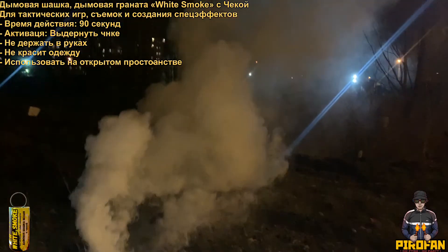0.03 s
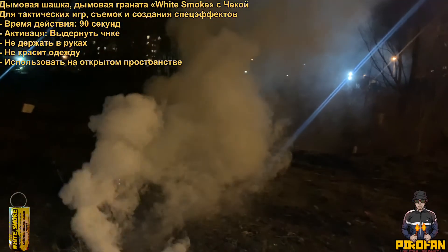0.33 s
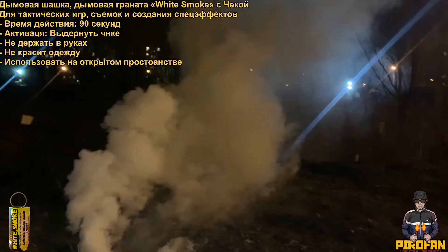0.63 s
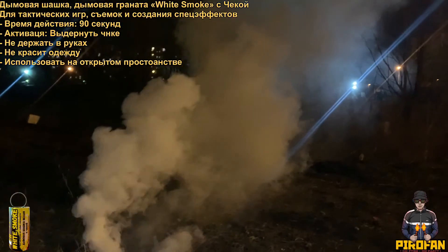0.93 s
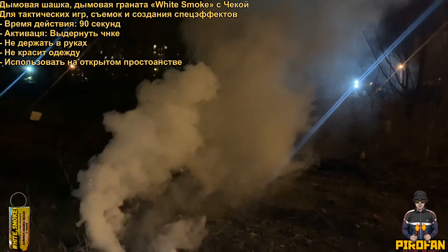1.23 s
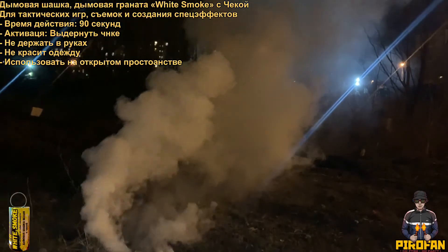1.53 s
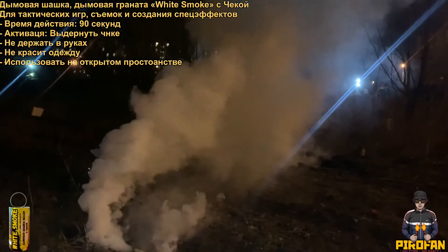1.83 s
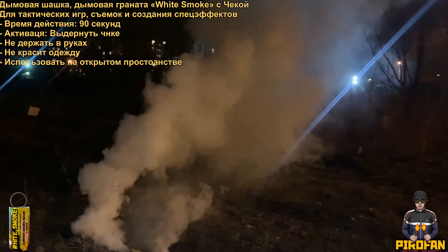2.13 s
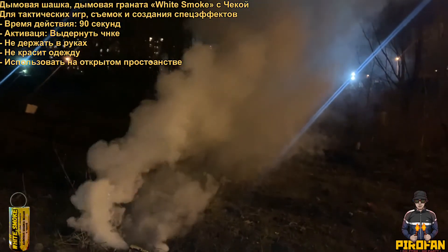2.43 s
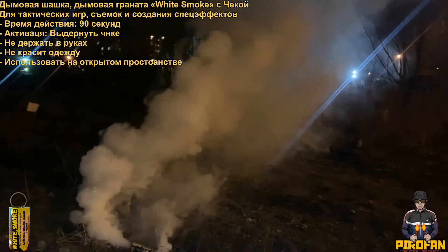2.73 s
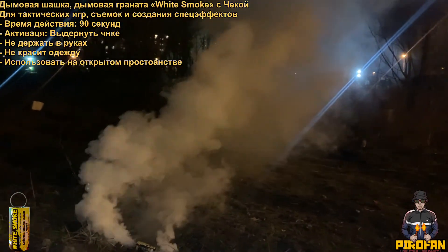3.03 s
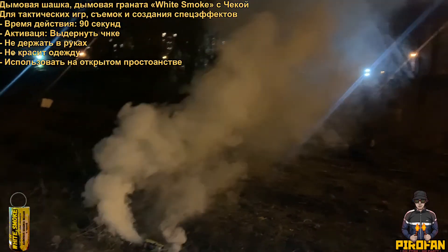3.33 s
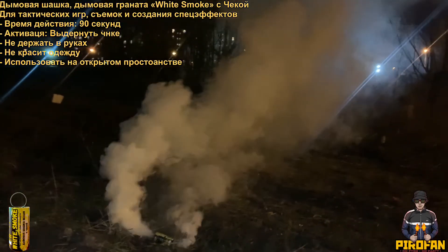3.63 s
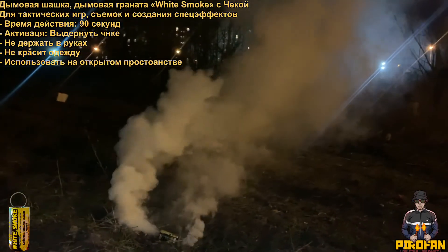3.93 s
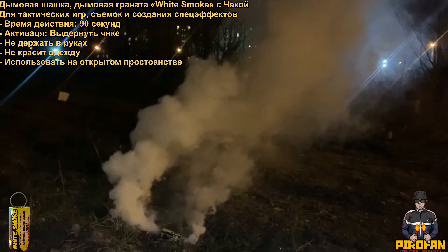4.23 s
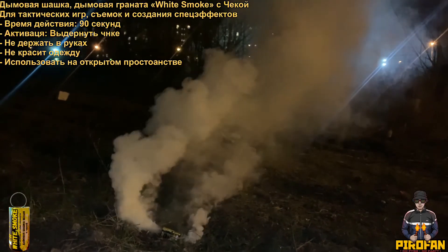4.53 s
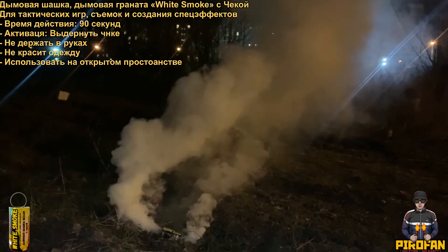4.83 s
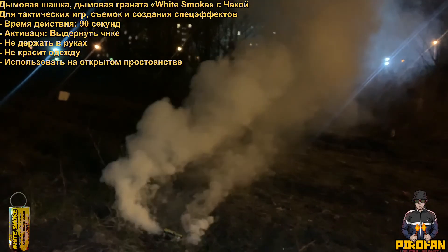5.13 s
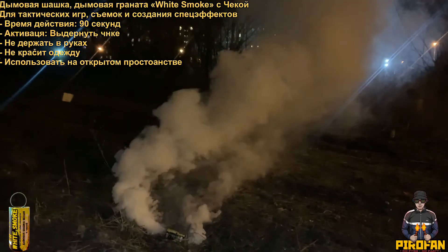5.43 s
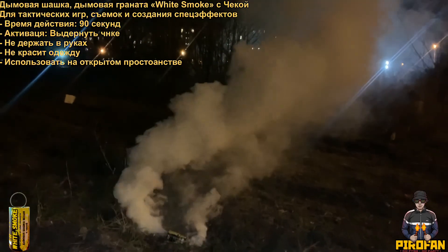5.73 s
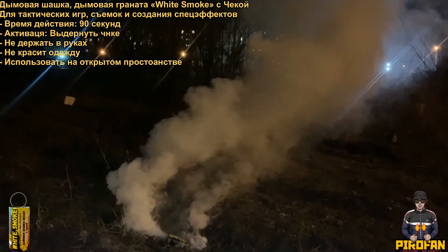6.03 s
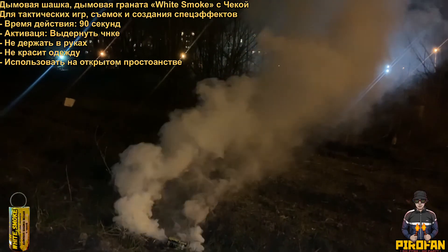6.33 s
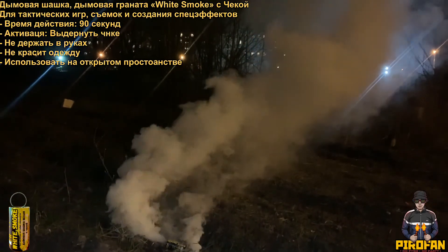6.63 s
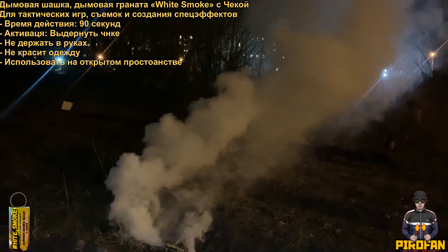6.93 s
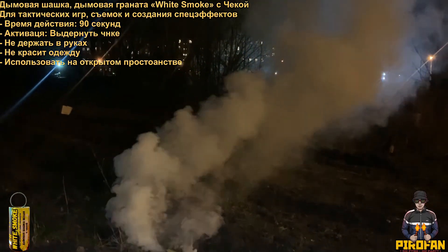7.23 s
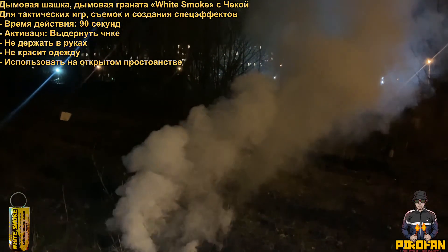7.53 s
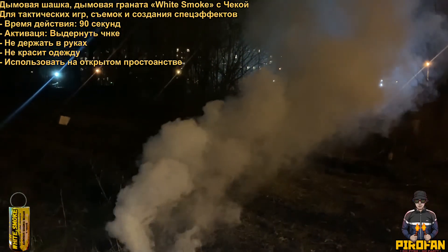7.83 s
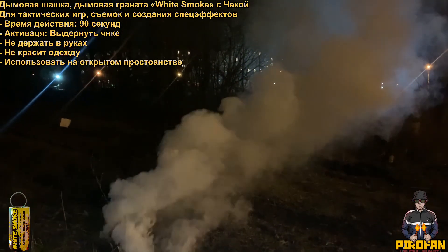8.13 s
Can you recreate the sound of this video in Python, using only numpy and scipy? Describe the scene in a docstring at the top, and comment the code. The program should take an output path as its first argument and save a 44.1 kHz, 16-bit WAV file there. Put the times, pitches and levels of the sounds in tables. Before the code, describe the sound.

A steady low rumble of far engines and tyres fills an open outdoor space, growing a little brighter as a car approaches. Close by, a smoke grenade hisses softly with a high, ringing edge. It breaks into spurts and small spits, then weakens, leaving occasional crisp spark snaps. A last run of faint spits comes at the end while the traffic carries on.

```python
"""Open ground at night, outside a town. Far engines rumble and drone, and tyres roar on a distant
road, slowly growing brighter as a car draws nearer. Up front a smoke grenade burns: gas hisses and
rings in its vent, slag chokes it into splutters, surges and spits, and sparks snap now and then.
Everything reaches the right microphone port a little before the left."""
import sys
import numpy as np
from scipy import signal
from scipy.fft import rfft, irfft, next_fast_len
from scipy.io import wavfile
from scipy.ndimage import uniform_filter1d, map_coordinates

SR = 44100
rng = np.random.default_rng(int(sys.argv[2]) if len(sys.argv) > 2 else 0)


def materialize(psi):
    """Save the field psi as 16-bit PCM at rate SR to the path in sys.argv[1].

    A 1-D psi becomes a single channel; in a 2-D psi each row is a channel.
    """
    bounded = np.clip(np.atleast_2d(psi).T, -1, 1)
    quanta = np.round(bounded * 32767).astype(np.int16)
    wavfile.write(sys.argv[1], SR, quanta)


N = 364707

# Tone colours of the noise layers. Each row: frequency in Hz, relative level in dB.
AIR_EQ = [(1000, -0.5), (6000, -3), (8500, -0.5), (10500, -1), (12400, -5.5), (13100, -19), (14400, -29.5)]
RUMBLE_EQ = [(12, -59.5), (24, -28.5), (31, -27), (41, -8.5), (52, -2), (65, 0.5), (76, -2), (105, -3.5),
             (145, -12.5), (220, -21), (400, -48), (900, -90.5)]
DRONE_EQ = [(50, -40), (100, -6.5), (130, -1), (175, -1.5), (200, -3), (230, -3), (295, -6), (350, -12.5),
            (420, -18.5), (600, -32), (1500, -80)]
FAR_TYRE_EQ = [(150, -23.5), (350, -8), (500, -2.5), (720, -1.5), (950, -0.5), (1130, -1), (1320, -2.5),
               (1600, -7.5), (2000, -16.5), (2600, -23), (3400, -34), (5000, -38.5), (8000, -57),
               (13000, -73)]
NEAR_TYRE_EQ = [(200, -26.5), (400, 0), (600, 0), (1100, -1.5), (1600, -1.5), (2000, -3.5), (2600, -6),
                (3300, -16), (4200, -23), (6000, -31), (9000, -50), (13000, -66)]
SWISH_EQ = [(1800, -19), (3000, -3), (3800, 0), (4400, 0), (5200, -12), (7000, -24), (8600, -18.5),
            (12000, -32.5)]  # the vent's softer, lower hiss
SPRAY_EQ = [(3000, -35), (6000, -8), (7300, -2.5), (8500, 1), (9300, -8), (10500, -17), (12400, -26.5),
            (14000, -49.5)]  # its fine, airy spray
JET_EQ = [(1500, -27), (3600, -10), (4400, 0.5), (5300, 0.5), (6300, 0), (7100, -7), (8000, -5.5),
          (9000, -10), (10500, -23.5), (12400, -28), (13500, -54.5)]  # its broad gas hiss
# Stereo images of the traffic and the vent at the two ports.
# Each row: frequency in Hz, likeness from 0 to 1, left minus right in dB, left lag in seconds.
TRAFFIC_IMAGE = [(60, 0.98, -1, 0.00022), (148, 0.93, -3, 0.00025), (262, 0.55, -4, 0.00055),
                 (413, 0.45, -0.5, 0.00072), (770, 0.57, 2.5, 0.00069), (1013, 0.57, 0, 0.00034),
                 (1480, 0.7, 2, 0.00036), (1870, 0.35, 0, 0.00034), (2610, .48, 0, .00032),
                 (4000, .17, -0.5, .00033)]
VENT_IMAGE = [(4050, 0.25, 1, 0.0003), (5900, 0.14, -0.3, .00027), (6900, 0.55, -0.5, .0003),
              (7750, 0.85, -5.5, 0.0003), (8950, 0.94, 0.5, 0.000291), (11000, 0.72, 0, .000275)]
# Weak echoes off the ground and nearby things. Each row: delay in seconds, level in dB.
REFLECTIONS = [(.0034, -36.5), (.0062, -32), (.0076, -36)]
# Low notes of far engines. Each row: pitch in Hz, width in Hz, level in dB.
ENGINE_NOTES = [(66, 9, -43.5), (175.5, 4, -53.5)]
# Fader ride of the car drawing nearer. Each row: time in seconds, level in dB.
CAR_FADER = [(0, -77), (1.3, -63.5), (3.3, -62.5), (5, -55), (6, -56.5), (6.6, -54.5), (7.4, -54.5),
             (8.27, -52)]
# Swells of swish and spray. Each row: middle in seconds, half length in seconds, level in dB.
SWISH_CUES = [(2.1, .35, -75), (3.05, 0.099, -81), (4.6, 0.36, -75), (5.6, .3, -77), (6.65, 0.26, -72.5),
              (7.95, .13, -73)]
SPRAY_CUES = [(1.25, .09, -72), (1.54, 0.1, -69), (3.0, 0.22, -81), (4.42, 0.21, -81), (7.6, 0.13, -80),
              (8.07, .12, -79)]
# Sparks snapping. Each row: time in seconds, snap level in dB, pitch in Hz, fizzle level in dB.
SPARK_CUES = [(.408, -58, 10300, -68), (3.675, -65, 10300, -76), (4.072, -59, 10300, -70),
              (4.2915, -34.5, 10100, -59), (4.3083, -58, 10600, -73), (4.322, -63, 10000, -75),
              (5.5908, -55, 10300, -65), (6.3662, -39.5, 9800, -55), (6.376, -63, 10500, -66),
              (6.6333, -59, 8700, -61), (7.002, -63, 10500, -74), (7.531, -56, 10200, -68),
              (8.131, -59, 8500, -68)]
# Weaker, lower rings of every snap. Each row: pitch ratio, level in dB against the main ring.
SPARK_UNDERTONES = [(0.76, -9), (.36, -23)]
# Dull spits of slag. Each row: time in seconds, rough peak level in dB.
SPIT_CUES = [(1.586, -54), (1.823, -51), (1.935, -54), (1.955, -45), (2.027, -54), (2.09, -53),
             (2.253, -46), (2.489, -51), (2.535, -58), (2.884, -63), (2.979, -61), (3.159, -64),
             (6.381, -61), (6.392, -63), (7.2926, -64), (7.308, -59), (7.453, -64), (7.485, -64),
             (7.5615, -59), (7.5765, -58), (7.669, -63.5), (7.96, -63), (7.975, -55), (8.016, -61),
             (8.0235, -59), (8.098, -56), (8.113, -57), (8.13, -52)]
# Gas breaking through the slag.
# Each row: start in seconds, length in seconds, attack in seconds, level in dB, opening pitch in Hz.
SURGE_CUES = [(1.05, .3, 0.27, -71, 5970), (1.45, .41, 0.32, -66.5, 6510), (1.89, .24, 0.096, -62.5, 6350),
              (2.15, .17, 0.044, -62.5, 6120), (2.34, .2, 0.06, -65, 5880), (2.85, .39, .15, -72, 6200),
              (4.24, .39, 0.089, -75, 5900), (7.26, .05, .04, -77, 6300), (7.435, .07, .03, -81, 6260),
              (7.551, .17, 0.019, -78, 6200), (7.875, .15, .08, -76, 6150), (8.085, .055, .02, -78, 6400)]
# Fader ride of the even burn as the gas flow dies down. Each row: time in seconds, level in dB.
BURN_FADER = [(0, -67.5), (.4, -64), (.8, -66), (1.45, -65.5), (2.2, -65.5), (2.6, -68.5), (3.15, -70.5),
              (3.45, -74), (3.8, -72.5), (4.15, -75), (4.55, -72.5), (4.85, -79), (5.4, -78), (6.2, -83),
              (6.6, -78), (7.1, -86.5), (7.7, -75), (8.27, -77)]


def amp(db):
    """Decibels to gain."""
    return 10 ** (np.asarray(db) / 20)


def unit(x):
    """Scale to rms 1."""
    return x / np.sqrt(np.mean(x ** 2) + 1e-20)


def along(points, hz):
    """Each column of a table over frequency, read on a log axis."""
    knots_hz, *columns = np.transpose(points)
    return [np.interp(np.log(hz + 1), np.log(knots_hz + 1), column) for column in columns]


def fader(rows):
    """Straight lines through (seconds, value) points, one value per sample."""
    return np.interp(np.arange(N) / SR, *np.transpose(rows))


def wobble(rate):
    """A smooth random curve, rate knots a second."""
    knots = rng.standard_normal(int(N * rate / SR) + 4)
    return map_coordinates(knots, [np.arange(N) * rate / SR])


def filtered(x, response):
    """Shape x with a complex response of frequency."""
    m = next_fast_len(N + SR // 2)
    return irfft(rfft(x, m) * response(np.fft.rfftfreq(m, 1 / SR)), m)[..., :N]


def rush(eq, patchy_db, size=4):
    """Two unrelated coloured noises, textured by drifting patches of gain about size cells across."""
    cells = signal.stft(rng.standard_normal((2, N)), nperseg=2048)[2]
    patches = uniform_filter1d(rng.standard_normal(cells.shape[1:]), size=size, axis=0)
    patches = uniform_filter1d(patches, size=size + 1, axis=1)
    pair = signal.istft(cells * amp(patchy_db * unit(patches)), nperseg=2048)[1][:, :N]
    return filtered(pair, lambda hz: amp(along(eq, hz)[0]))


def at_ports(pair, image):
    """Mix two unrelated signals into a stereo pair of rms 1: partly alike, the left side late."""
    m = next_fast_len(N + SR // 2)
    hz = np.fft.rfftfreq(m, 1 / SR)
    alike, left_db, lag = along(image, hz)
    turn = np.arccos(np.clip(alike, 0, 1)) / 2
    mid, side = rfft(pair, m) * [np.cos(turn), np.sin(turn)]
    lean = amp(left_db / 2) * np.exp(-1j * np.pi * hz * lag)
    return unit(irfft(np.array([(mid + side) * lean, (mid - side) / lean]), m)[:, :N])


def add(track, s, sound):
    """Mix a short sound into a track at s seconds."""
    part = track[..., max(round(s * SR), 0):][..., :sound.shape[-1]]
    part += sound[..., :part.shape[-1]]


def air(db=-82):
    """A faint, even bed of hiss."""
    return amp(db) * at_ports(rush(AIR_EQ, patchy_db=3), VENT_IMAGE)


def traffic(rumble_db=-33.5):
    """Far engines rumble and drone under the even roar of many tyres; a nearer car adds brightness."""
    def layer(db, eq, **texture):
        return amp(db) * at_ports(rush(eq, **texture), TRAFFIC_IMAGE)

    drone_db = fader([(3.44, -41.5), (3.47, -39)])  # a far vehicle pulls away
    tyre_db = fader([(3.7, -46.5), (5.7, -45)])  # more cars come onto the road
    rumble = layer(rumble_db + 0.25 * wobble(4.9), RUMBLE_EQ, patchy_db=0.45)
    drone = layer(drone_db + 0.4 * wobble(2.86), DRONE_EQ, patchy_db=1.62)
    tyres = layer(tyre_db + 0.13 * wobble(11), FAR_TYRE_EQ, patchy_db=2.4, size=3)
    car = layer(fader(CAR_FADER) + 0.38 * wobble(2.4), NEAR_TYRE_EQ, patchy_db=3, size=3)
    return rumble + drone + tyres + car


def engine_throb():
    """Far engines hold two unsteady low notes."""
    t, notes = np.arange(N) / SR, np.zeros(N)
    for hz, width, db in ENGINE_NOTES:
        phase = 2 * np.pi * hz * t
        notes += amp(db) * unit(wobble(2 * width) * np.cos(phase) + wobble(2 * width) * np.sin(phase))
    return np.std(notes) * at_ports(np.array([notes, np.zeros(N)]), TRAFFIC_IMAGE)


def vent_swells(cues, eq):
    """A hiss of one colour swells from the vent and fades on each cue."""
    t = np.arange(N) / SR
    envelope = sum(amp(db) * np.exp(-((t - s) / half_length) ** 2) for s, half_length, db in cues)
    return envelope * at_ports(rush(eq, patchy_db=5.5), VENT_IMAGE)


def sparks(ring_s=0.00015, crack_s=0.00003, crack_db=-23, scatter_db=-29):
    """Each spark cracks, rings a few cycles and fizzles crisply; the grass returns a faint scatter."""
    lead_s, left_lag_s = 0.002, 0.000175
    fizzle_t60, scatter_t60 = 0.014, 0.05
    t = np.arange(SR // 12) / SR - lead_s - np.array([[left_lag_s], [-left_lag_s]]) / 2
    crack = amp(crack_db) * t / crack_s * np.exp(0.5 - (t / crack_s) ** 2 / 2)
    ring_envelope = np.exp(1 - np.hypot(t / ring_s, 1) ** 1.3)
    partials = [(1, 0)] + SPARK_UNDERTONES
    snaps, fizzle, scatter = np.zeros((3, 2, N))
    for s, db, hz, fizzle_db in SPARK_CUES:
        tones = sum(amp(level) * np.sin(2 * np.pi * ratio * hz * t) for ratio, level in partials)
        add(snaps, s - lead_s, amp(db) * (ring_envelope * tones + crack))
        add(fizzle, s - lead_s, amp(fizzle_db - 60 * np.abs(t) / fizzle_t60) * (t > 0))
        add(scatter, s - lead_s, amp(db + scatter_db - 60 * np.abs(t) / scatter_t60) * (t > 0))
    crisp = unit(rush([(1500, -20), (4000, 6), (9000, -3), (12000, -6), (16000, -10)], patchy_db=-4))
    grass = unit(rush([(2000, -8), (5000, -1), (8000, 6), (10500, 12), (14000, -7)], patchy_db=3))
    return snaps + fizzle * crisp + scatter * grass


def resonance(centre_hz, half_width_hz):
    """Turbulence rings in the vent: a noise band with breathy skirts, riding on a moving centre."""
    skirt = [(0, 0), (half_width_hz, -1.5), (1.6 * half_width_hz, -11), (3 * half_width_hz, -26),
             (SR / 2, -120)]
    phase = 2 * np.pi * np.cumsum(centre_hz) / SR
    return sum(rush(skirt, patchy_db=4, size=3) * carrier for carrier in (np.cos(phase), np.sin(phase)))


def jet(centre_hz, ring_db, half_width_hz, splutter=0.32, upper_ratio=1.27, upper_db=-14):
    """Slag chokes the gas into quick spurts, felt most in two resonances set ring_db over the hiss."""
    spurts_db = splutter * (2 * wobble(35) + 3 * wobble(170)) + 0.36 * wobble(5.6)
    broad = amp(0.45 * spurts_db) * at_ports(rush(JET_EQ, patchy_db=4.5), VENT_IMAGE)
    lower = resonance(centre_hz, half_width_hz)
    upper = amp(upper_db) * resonance(upper_ratio * centre_hz, half_width_hz)
    ring = amp(spurts_db) * at_ports(lower + upper, VENT_IMAGE)
    return (broad + amp(ring_db) * ring) / np.hypot(1, amp(ring_db))


def spits(pitch_hz=6170, rise_s=0.001, t60=0.028, crest_db=7):
    """Bits of slag burst in the vent, each a short, ringing puff."""
    t, envelope = np.arange(SR // 10) / SR, np.zeros(N)
    attack = np.minimum(t / rise_s, 1)
    for s, db in SPIT_CUES:
        add(envelope, s - rise_s, attack * amp(db - crest_db - 60 * (t - rise_s) / t60))
    return envelope * jet(np.full(N, pitch_hz), ring_db=8.5, half_width_hz=410)


def surges(release_s=0.04, sag_hz_per_s=630):
    """Gas breaks through the slag and drives the vent hard: a narrow, spluttering ring that sags."""
    t, envelope, weighted_hz = np.arange(N) / SR, np.zeros(N), np.zeros(N)
    for s, length, attack, db, hz in SURGE_CUES:
        end = s + length
        swell = amp(db) * fader([(s, 0), (s + attack, 1)]) * fader([(end, 1), (end + release_s, 0)])
        envelope += swell
        weighted_hz += swell * (hz - sag_hz_per_s * (t - s))
    centre_hz = weighted_hz / (envelope + 1e-12)
    return envelope * jet(centre_hz, ring_db=8, half_width_hz=410, splutter=0.62)


def burn(pitch_hz=5625, wander_hz=79.7):
    """Gas streams from the vent in an even hiss that wanders in pitch and slowly dies down."""
    ring_db = fader([(1.9, -3.5), (2.4, 6.5)])  # rings more once slag has narrowed the vent
    centre_hz = pitch_hz + wander_hz * wobble(3)
    return amp(fader(BURN_FADER)) * jet(centre_hz, ring_db, half_width_hz=540)


def scene():
    """The grenade in front of the town, lightly coloured by near echoes."""
    def echoes(hz):
        return 1 + sum(amp(db) * np.exp(-2j * np.pi * hz * delay) for delay, db in REFLECTIONS)

    vent = burn() + surges() + spits()
    swells = vent_swells(SWISH_CUES, SWISH_EQ) + vent_swells(SPRAY_CUES, SPRAY_EQ)
    grenade = vent + swells + sparks()
    backdrop = traffic() + engine_throb() + air()
    return filtered(grenade + backdrop, echoes)


def record(dry, top_hz=14400):
    """A steep high cut on the whole mix."""
    return filtered(dry, lambda hz: 1 / np.sqrt(1 + (hz / top_hz) ** 60))


dry = scene()
out = record(dry)
materialize(out)
```